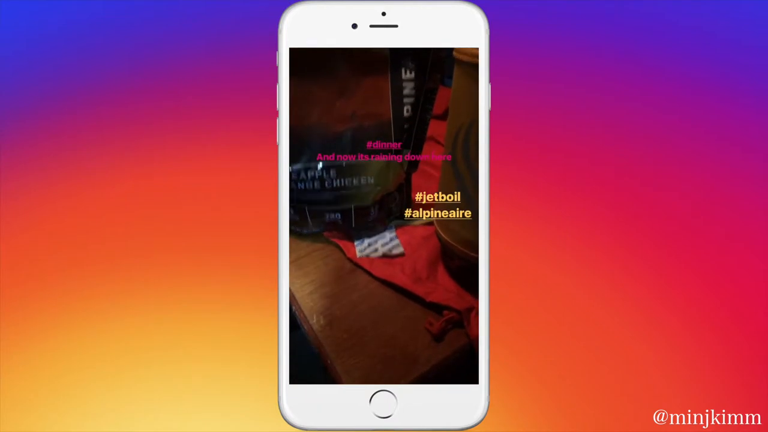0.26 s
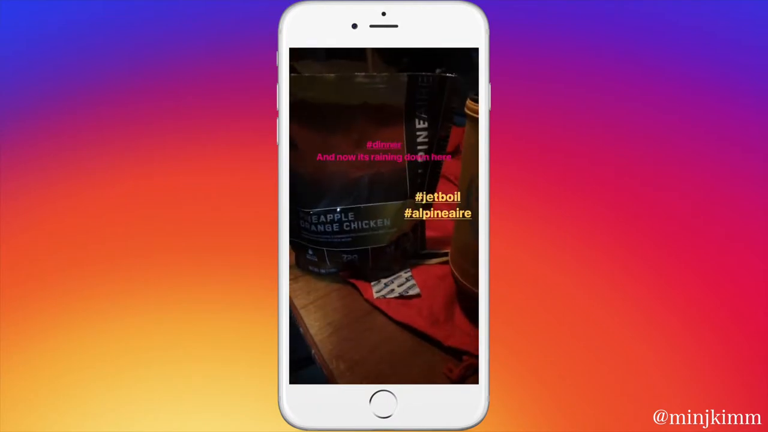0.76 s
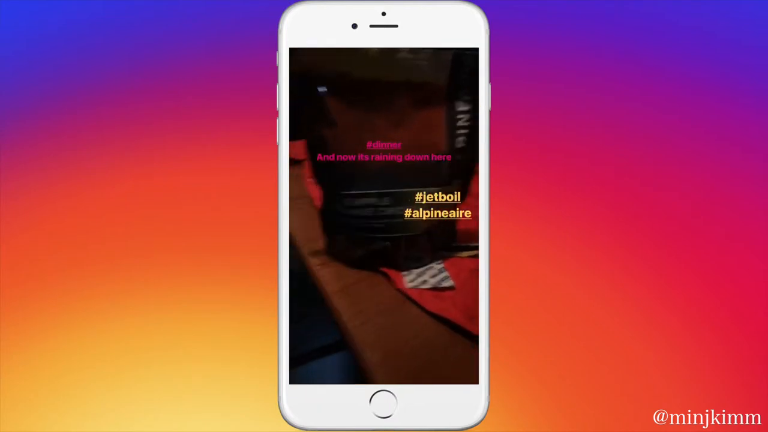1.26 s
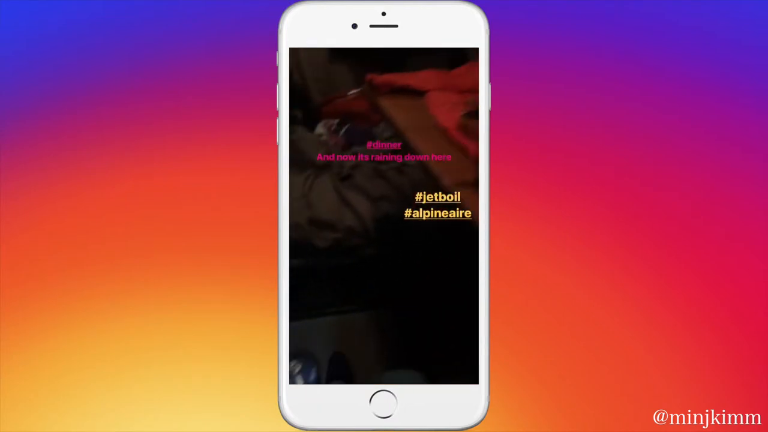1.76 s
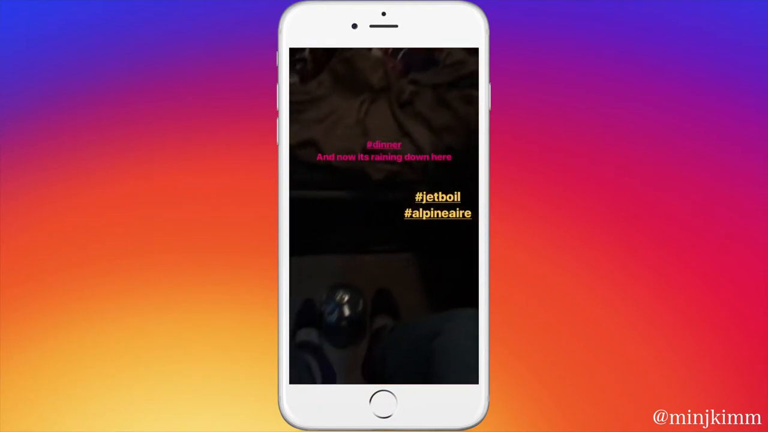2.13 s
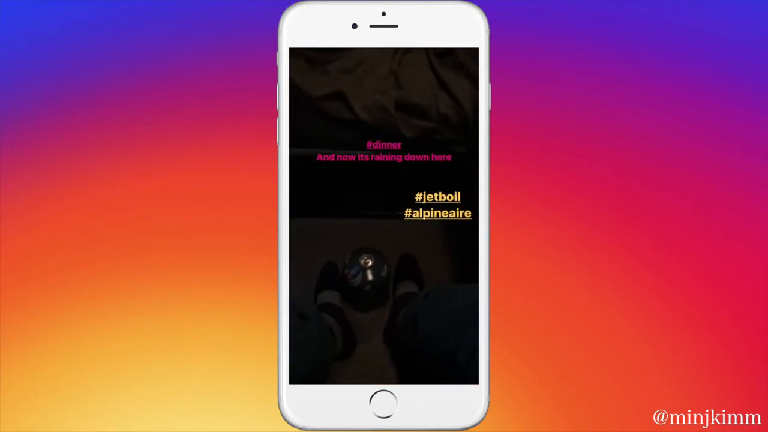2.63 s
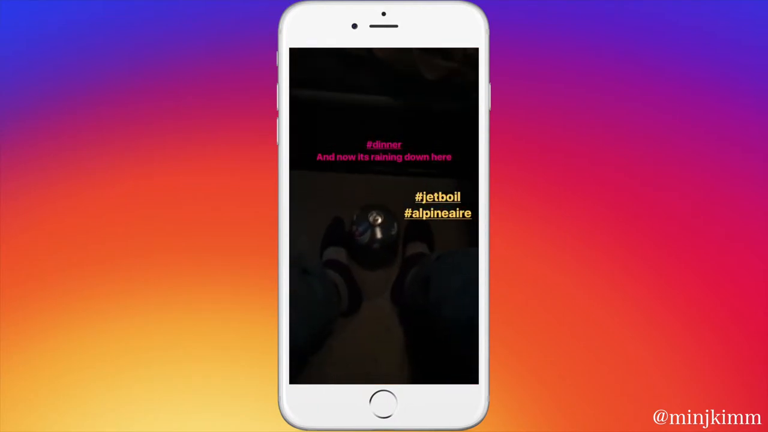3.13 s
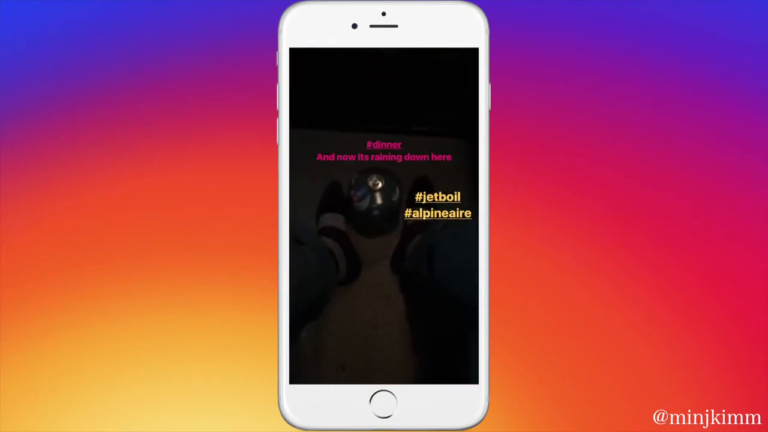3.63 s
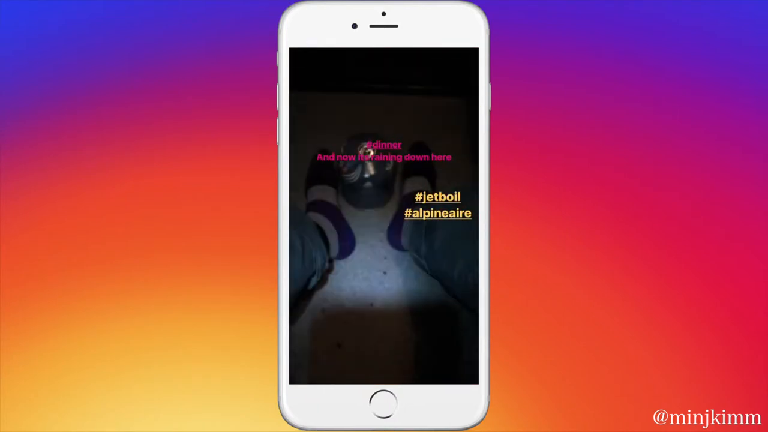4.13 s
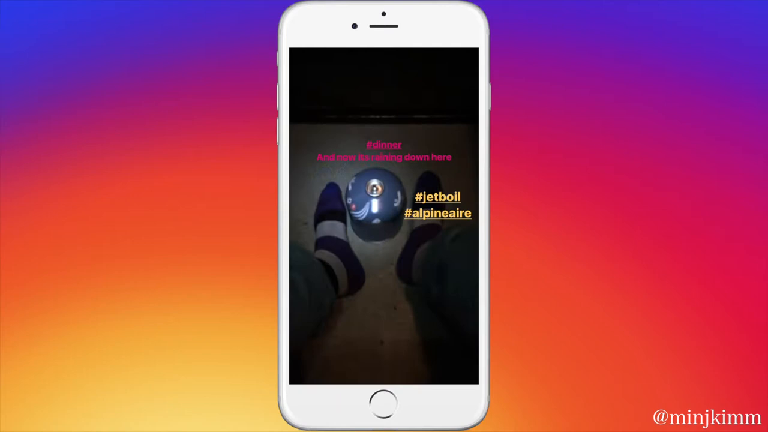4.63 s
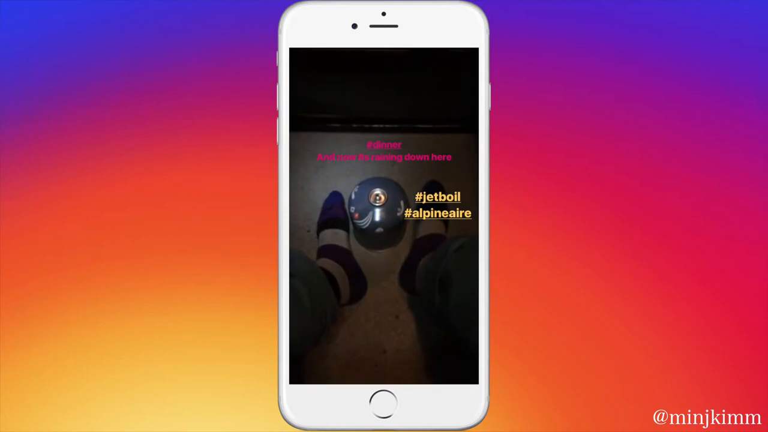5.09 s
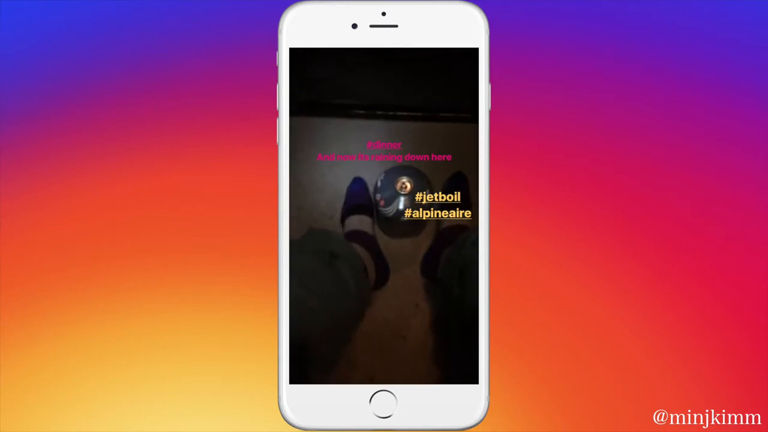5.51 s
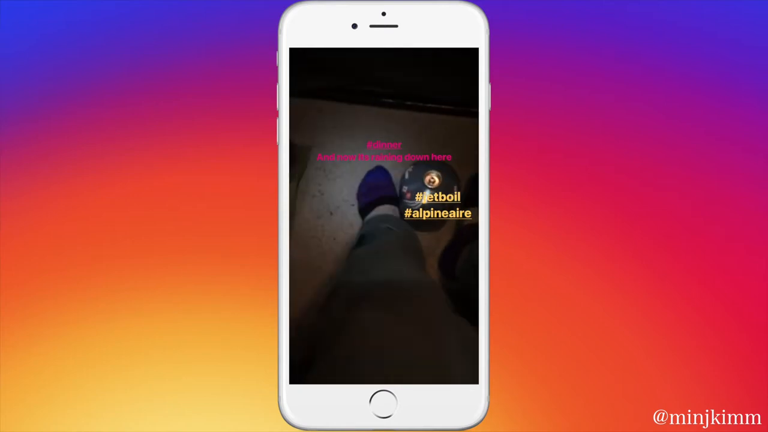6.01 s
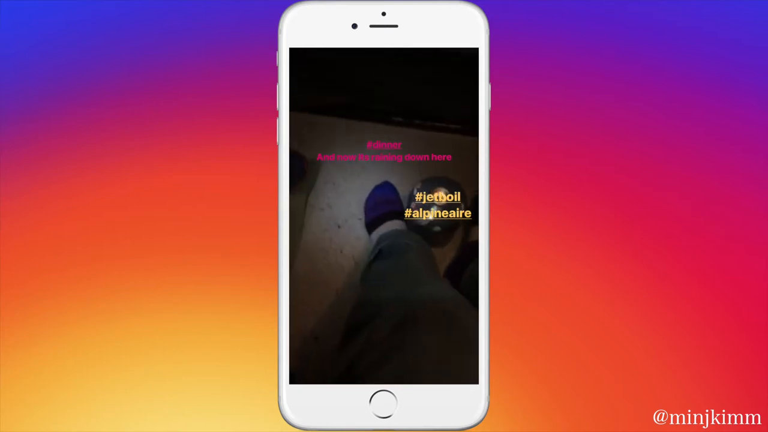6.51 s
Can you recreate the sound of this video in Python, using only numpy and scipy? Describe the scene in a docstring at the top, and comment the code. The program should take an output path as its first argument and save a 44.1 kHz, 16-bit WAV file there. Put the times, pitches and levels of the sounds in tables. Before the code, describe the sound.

Raindrops spatter irregularly on a van roof, heard from inside, with a few heavier drips thudding on the panel.

```python
"""Rain on a parked van

Heard from inside, with a small microphone in the cabin under the roof. Drops burst into spatters
of droplets that tick on the damped panel overhead; now and then a heavy drip makes it drum.
A fine patter and a faint hiss fill the gaps."""
import sys
import numpy as np
from scipy import signal
from scipy.fft import rfft, irfft
from scipy.io import wavfile

SR = 44100
rng = np.random.default_rng(int(sys.argv[2]) if len(sys.argv) > 2 else 0)


def materialize(psi):
    """Save the field psi as 16-bit PCM at rate SR to the path in sys.argv[1].

    A 1-D psi becomes a single channel; in a 2-D psi each row is a channel.
    """
    bounded = np.clip(np.atleast_2d(psi).T, -1, 1)
    quanta = np.round(bounded * 32767).astype(np.int16)
    wavfile.write(sys.argv[1], SR, quanta)


N = 297675
RING = SR // 5   # samples for which a touch rings

# The tone of the roof's dense ringing. Each row: frequency in Hz, relative spectral level in dB.
ROOF_COLOUR = [(35, -16), (75, 4), (130, 1.5), (300, 9), (450, -5), (650, 2.5), (1100, -5.5), (1700, -20),
               (2700, -18), (4200, -32.5), (7000, -31.5), (13000, -40.5), (16000, -38)]


def splats(spots, rise_s=0.0011, burst=0.72, burst_s=0.0077, run_out=1.31, typical_db=-53.5):
    """A drop bursts overhead and its spray rattles down around it, dulling as it dies away."""
    # The larger drops. Each row: start in seconds, level in dB, fall in seconds, brightness in dB.
    large_drops = [(0, -56, 0.026, 7), (.105, -58.5, 0.025, -23), (0.143, -46.5, 0.022, 2),
                   (.231, -60, 0.032, 0), (0.262, -62.5, 0.021, 1), (.523, -52, 0.056, 2),
                   (.877, -63.5, 0.078, -4.5), (.967, -64, 0.031, 8.5), (.992, -53, 0.066, -8),
                   (1.128, -56.5, .12, -1), (1.242, -56, 0.041, 4), (1.295, -54, .08, -3),
                   (1.42, -47.5, 0.082, -1.5), (1.619, -66, 0.047, 0.5), (1.917, -49, 0.033, 0),
                   (1.959, -48.5, 0.081, 1.5), (2.177, -50.5, 0.036, 1.5), (2.245, -55.5, 0.087, 0),
                   (2.41, -58, 0.03, -4), (2.486, -46.5, 0.042, 1.5), (2.571, -49, 0.026, 1),
                   (2.654, -51.5, 0.055, -8), (2.741, -51.5, 0.014, -3), (2.896, -57, 0.05, 0.5),
                   (3.018, -48.5, 0.031, 2.5), (3.198, -49.5, 0.087, -1), (3.281, -48.5, 0.048, 1),
                   (3.361, -56, 0.11, -8), (3.541, -57, 0.037, 7.5), (3.61, -55, 0.064, -1.5),
                   (3.765, -51, 0.015, 4.5), (3.893, -58.5, 0.075, -1), (3.941, -54.5, 0.065, 2.5),
                   (4.025, -67, 0.011, 11), (4.078, -48, .03, 0.5), (4.165, -61.5, 0.49, -2.5),
                   (4.539, -59.5, 0.078, 1.5), (4.657, -52.5, 0.06, 1), (4.831, -59, 0.044, -2),
                   (4.918, -50, 0.085, 3.5), (5.06, -53, 0.061, -2), (5.111, -63, 0.045, 6),
                   (5.39, -59.5, 0.091, -1.5), (5.587, -55.5, .1, 0.5), (5.798, -62.5, 0.029, -9),
                   (5.9, -66.5, 0.14, 0.5), (5.971, -55, 0.078, -1), (6.018, -48, 0.091, 0.5),
                   (6.205, -61, .12, -7), (6.266, -50.5, 0.064, -2.5), (6.501, -53.5, 0.079, -0.5),
                   (6.7, -61.5, 0.11, -2)]
    # The bass of the splats over time. Each row: time in seconds, gain in dB.
    bass_curve = [(0, -10), (1.1, -3), (1.9, 0), (4.6, 2.5), (6.75, 0.5)]
    starts, db, fall_s, bright_db = np.transpose(large_drops + small_drops())
    levels_db = band_levels(db - typical_db, (-54, -52.5, -63.5, -71), growth=(0.43, 0.69, 0.41, 0.42))
    levels_db += np.outer((0, 0, 0.54, 1), bright_db)   # brightness acts on treble and fizz
    levels_db[0] += np.interp(starts, *np.transpose(bass_curve))
    levels_db[0, len(large_drops):] -= 4   # small drops carry less bass
    t, fall_s = np.arange(2 * RING) / SR, fall_s[:, None]
    since_peak = np.maximum(t - rise_s, 0)
    attack = np.minimum(t / rise_s, 1) * (1 + burst * np.exp(-since_peak / burst_s))
    swell = attack * np.exp(-(since_peak / fall_s) ** run_out)
    sounds = spray(swell, spots, per_s=2200, spread_db=2.0, count=3)
    touch_db = -7 - 132 * fall_s   # the longer a splat, the weaker its opening tick
    sounds[:, :RING] += from_db(touch_db) * contact()
    bands = voiced_bands(hollow(sounds), levels_db)
    damping = (.9, 1, 1.25, 1.5)   # higher bands die faster; 1 leaves a band as it is
    sounds = sum(band * np.exp((1 - rate) * since_peak / fall_s) for band, rate in zip(bands, damping))
    return place(starts, sounds * np.linalg.norm(swell, axis=1, keepdims=True))


def small_drops(count=30, level_db=-64.5, spread_db=2, fall_s=0.047):
    """Small drops land at loose intervals, each with a size of its own; rows as for the larger ones."""
    timing, size = rng.random((count, 2)).T
    starts = (np.arange(count) + timing) / count * N / SR
    levels_db = level_db + spread_db * (2 * size - 1)
    return [(start, db, fall_s, 0) for start, db in zip(starts, levels_db)]


def spray(swell, spots, per_s, spread_db, count):
    """Droplets rattle down under each swell, shared among a few spots of the roof."""
    out = 0
    for _ in range(count):
        clicks = swell * droplets(swell.shape, per_s / count, spread_db)
        struck = spots[rng.integers(len(spots), size=len(swell))]
        out = out + signal.fftconvolve(clicks, struck, axes=1)
    return unit_energy(out[:, :swell.shape[1]])


def droplets(shape, per_s, spread_db):
    """Droplets land as random clicks: many small ones, a few large."""
    sizes = from_db(spread_db * np.minimum(rng.exponential(1, shape), 4)) * rng.choice([-1, 1], shape)
    return sizes * (rng.random(shape) < per_s / SR)


def contact():
    """The first touch, heard straight through the panel: a minimum-phase click in the roof's colour."""
    hz = np.maximum(np.fft.rfftfreq(RING, 1 / SR), 1)
    cepstrum = irfft(np.log(from_db(at_hz(ROOF_COLOUR, hz))), RING)
    cepstrum[1:RING // 2] *= 2
    cepstrum[RING // 2 + 1:] = 0
    return unit_energy(irfft(np.exp(rfft(cepstrum)), RING))


def hollow(sounds, low_hz=560, high_hz=1155, q=21, ring_db=3.0):
    """Each landing spot favours a hollow note of its own."""
    pitches = low_hz * (high_hz / low_hz) ** rng.random(len(sounds))
    rings = [signal.lfilter(*signal.iirpeak(hz, q, fs=SR), sound) for hz, sound in zip(pitches, sounds)]
    return sounds + from_db(ring_db) * np.array(rings)


def band_levels(excess_db, typical_db, growth):
    """Bass, middle, treble and fizz each gain `growth` dB for every dB a drop exceeds a typical one."""
    return np.array(typical_db)[:, None] + np.outer(growth, excess_db)


def voiced_bands(sounds, levels_db, edges_hz=(520, 1800, 4500)):
    """Split each sound into bass, middle, treble and fizz, and set the energy of each band."""
    bands = [(edges_hz[0], "low"), (edges_hz[:2], "band"), (edges_hz[1:], "band"), (edges_hz[2], "high")]
    filters = [signal.butter(3, hz, kind, fs=SR, output="sos") for hz, kind in bands]
    return [from_db(db)[:, None] * unit_energy(signal.sosfilt(sos, sounds + 1e-18))
            for sos, db in zip(filters, levels_db)]


def drips(spots, splash_s=0.011, hush_s=0.063, contact_db=-7.0, clang_hz=1400, clang_db=-9.0):
    """One heavy blow makes the panel thud, drum and clang, with a short dense splash."""
    # Each row: start in seconds, then the levels of thud, drum and splash in dB.
    heavy_drips = [(1.841, -53, -41, -65.5), (1.929, -24, -41, -50.5), (2.246, -33, -37, -51.5),
                   (2.291, -49, -31.5, -60), (2.329, -24, -34, -53.5), (3.057, -36, -29.5, -55.5),
                   (3.26, -17.5, -26, -39), (4.2988, -17, -25, -30.5), (5.244, -68, -37.5, -65)]
    starts, thud_db, drum_db, splash_db = np.transpose(heavy_drips)
    excess_db = splash_db + 39.5   # above a typical drip; a harder one splashes brighter
    levels_db = band_levels(excess_db, (-40, -40, -46.5, -59.5), growth=(.87, 1, 1.35, 1.4))
    t = np.arange(RING) / SR
    swell = np.exp(-t / splash_s) * np.ones((len(starts), 1))
    splash = spray(swell, spots, per_s=5600, spread_db=4.0, count=5) + from_db(contact_db) * contact()
    splash += from_db(clang_db) * signal.lfilter(*signal.iirpeak(clang_hz, 2, fs=SR), splash)
    # a dip near 720 Hz keeps the splash from sounding boxy between the low drum and the clang
    splash = signal.lfilter(*signal.iirnotch(720, 1.6, fs=SR), splash)
    splash *= np.exp(-(t / hush_s) ** 2)   # the lining stops the ringing
    splash = sum(voiced_bands(splash, levels_db)) * np.sqrt(0.038 * SR)   # levels as RMS over 38 ms
    thud = from_db(thud_db)[:, None] * mode(hz=157, t60=0.022)   # the panel gives way under the blow
    drum = from_db(drum_db)[:, None] * mode(hz=278.3, t60=0.087)   # the whole panel flexes
    onset = 1 - np.exp(-t / 0.0013)   # it takes a moment to get moving
    return place(starts, splash + onset * (thud + drum))


def ticks(max_q=12.4, fall_s=0.022, level_db=-4.0):
    """A tiny splash wakes one resonance, a hollow tap or a bright tick; high ones are the most damped."""
    # Each row: start in seconds, pitch in Hz, relative level in dB.
    taps = [(.1432, 745, -51), (0.3646, 5400, -64.5), (0.437, 1030, -51), (0.4778, 2500, -56.5),
            (0.6376, 207, -47), (.9962, 614, -44.5), (1.1317, 2500, -55.5), (1.3002, 580, -43),
            (1.5695, 1190, -53), (1.9872, 683, -39.5), (3.059, 1000, -45), (3.7682, 860, -40.5),
            (5.9802, 605, -40), (6.0232, 620, -41.5)]
    t = np.arange(RING) / SR
    splash = np.exp(-t / fall_s)
    starts, sounds = [], []
    for start, hz, db in taps:
        q = max_q * min(1, 900 / hz) ** .75
        ring = signal.lfilter(*signal.iirpeak(hz, q, fs=SR), splash * rng.standard_normal(RING))
        starts.append(start)
        sounds.append(from_db(db + level_db) * unit_energy(ring) * np.linalg.norm(splash))
    return place(starts, sounds)


def roof_spots(count, modes_db, scatter_db=2.5):
    """Every spot of the roof excites the panel modes with strengths and signs of its own."""
    # Roof and cabin modes. Each row: frequency in Hz, relative level in dB, seconds to fall 60 dB.
    roof_modes = [(77.4, -8, 0.29), (123, -4, 0.066), (165.6, -5, 0.24), (215, -6, 0.081),
                  (288.7, 12.5, 0.037), (407.5, -4, 0.1), (459, 1, 0.064), (624, -10, 0.026),
                  (944, -1.5, 0.041), (1045, -10.5, 0.035), (1159, -5.5, 0.07), (1245, -8.5, 0.13),
                  (1478, 1.5, 0.022), (1593, -15, 0.037), (1720, -3.5, 0.015), (2028, -13, 0.057),
                  (2325, -14.5, 0.013), (2846, -17, 0.042)]
    rings = np.array([from_db(db) * mode(hz, t60) for hz, db, t60 in roof_modes])
    size = (count, len(rings))
    strengths = from_db(scatter_db * rng.standard_normal(size)) * rng.choice([-1, 1], size)
    modal_ring = from_db(modes_db) * unit_energy(strengths @ rings)
    return unit_energy(dense_ring(ROOF_COLOUR, count) + modal_ring)


def dense_ring(colour, count, snap_db=5.5, snap_s=0.0012):
    """The roof's higher modes at several spots: a direct snap, then half-octave bands of dying noise."""
    # Each row: frequency in Hz, seconds for the ringing to fall 60 dB.
    ring_times = [(70, 0.14), (300, 0.17), (1000, 0.036), (3000, 0.037), (12000, 0.017)]
    t, out = np.arange(RING) / SR, 0
    edges_hz = np.geomspace(30, 17000, 19)
    snap = 1 + from_db(snap_db) * np.exp(-t / snap_s)
    for low, high in zip(edges_hz, edges_hz[1:]):
        hz = np.sqrt(low * high)
        decay = np.exp(-np.log(1000) * t / at_hz(ring_times, hz))
        burst = rng.standard_normal((count, RING)) * snap * decay
        band = signal.sosfilt(signal.butter(2, [low, high], "band", fs=SR, output="sos"), burst)
        out = out + unit_energy(band) * np.sqrt(high - low) * from_db(at_hz(colour, hz))
    return unit_energy(out)


def mode(hz, t60):
    """A struck mode: a sine that falls 60 dB in t60 seconds."""
    t = np.arange(RING) / SR
    return np.sin(2 * np.pi * hz * t) * np.exp(-np.log(1000) * t / t60)


def patter(level_db=-3.5):
    """Fine rain all over the roof, dulled by its lining."""
    # Its tone in the cabin. Each row: frequency in Hz, relative spectral level in dB.
    colour = [(30, -4), (75, 4), (150, 6.5), (300, 2), (450, -1.5), (800, -5), (1300, -13.5), (2500, -23.5),
              (5000, -34.5), (15000, -32.5)]
    # Its strength. Each row: time in seconds, relative level in dB.
    strength = [(0.0, -50), (0.21, -57.5), (4.02, -60.5), (6.75, -60.5)]
    spots = dense_ring(colour, count=12)
    clicks = droplets((len(spots), N + RING), per_s=30, spread_db=3.0)
    rain = signal.oaconvolve(clicks, spots, axes=1).sum(axis=0)
    curve_db = np.interp(np.arange(N) / SR, *np.transpose(strength))
    return from_db(curve_db + level_db) * unit_energy(rain[RING:RING + N]) * np.sqrt(N)


def hiss(level_db=-75):
    """An even, faint noise floor behind the rain."""
    # Each row: frequency in Hz, relative spectral level in dB.
    colour = [(30, 5), (200, -11), (1000, 11.5), (4000, 2.5), (8000, -1.5), (13000, -3.5), (16000, -7)]
    hz = np.maximum(np.fft.rfftfreq(N, 1 / SR), 1)
    noise = irfft(rfft(rng.standard_normal(N)) * from_db(at_hz(colour, hz)), N)
    return from_db(level_db) * unit_energy(noise) * np.sqrt(N)


def from_db(db):
    """Decibels to gain."""
    return 10 ** (np.asarray(db) / 20)


def unit_energy(x):
    """Scale each row to an energy of 1."""
    return x / np.sqrt(np.sum(x ** 2, axis=-1, keepdims=True) + 1e-30)


def at_hz(points, hz):
    """Read a table on a log-frequency axis."""
    table_hz, value = np.transpose(points)
    return np.interp(np.log(hz), np.log(table_hz), value)


def place(starts, sounds):
    """Mix sounds into one track, each from its start in seconds."""
    track = np.zeros(N)
    for start, sound in zip(starts, sounds):
        first = round(start * SR)
        part = sound[:N - first]
        track[first:first + len(part)] += part
    return track


def scene():
    """Everything overhead, heard in mono at one point in the cabin."""
    spots = roof_spots(count=32, modes_db=-4.0)
    return (hiss() + patter() + drips(spots) + splats(spots) + ticks())[None]


def record(dry, low_cut_hz=48, high_cut_hz=15300):
    """The small microphone loses the deepest bass; the top is cut steeply."""
    thin = signal.sosfilt(signal.butter(2, low_cut_hz, "high", fs=SR, output="sos"), dry)
    return signal.sosfilt(signal.ellip(12, .1, 80, high_cut_hz, fs=SR, output="sos"), thin)


dry = scene()
out = record(dry)
materialize(out)
```